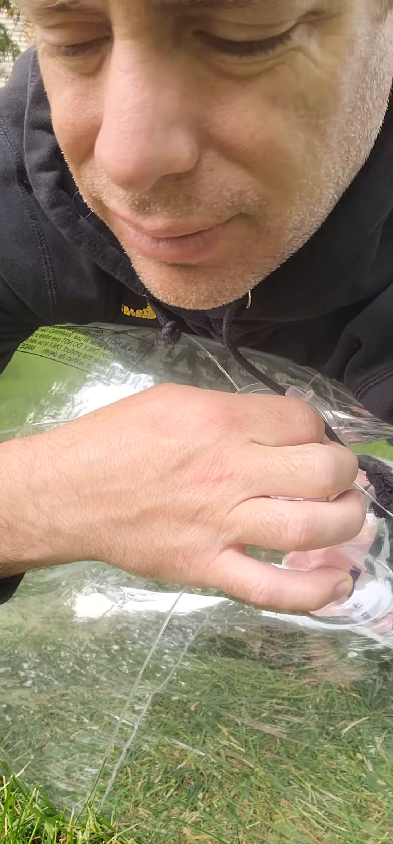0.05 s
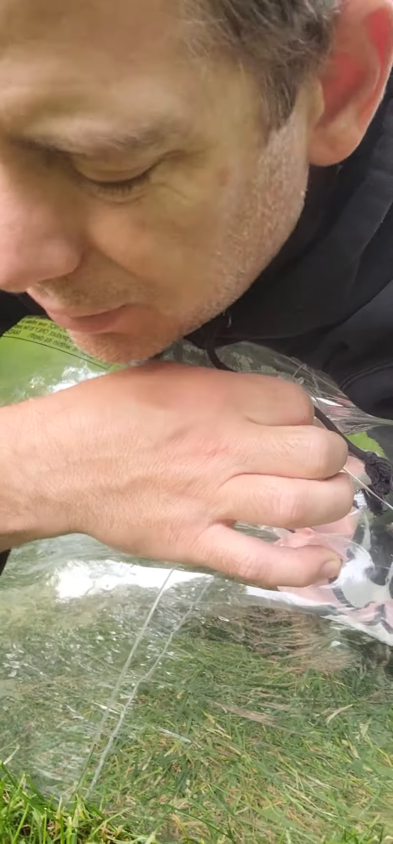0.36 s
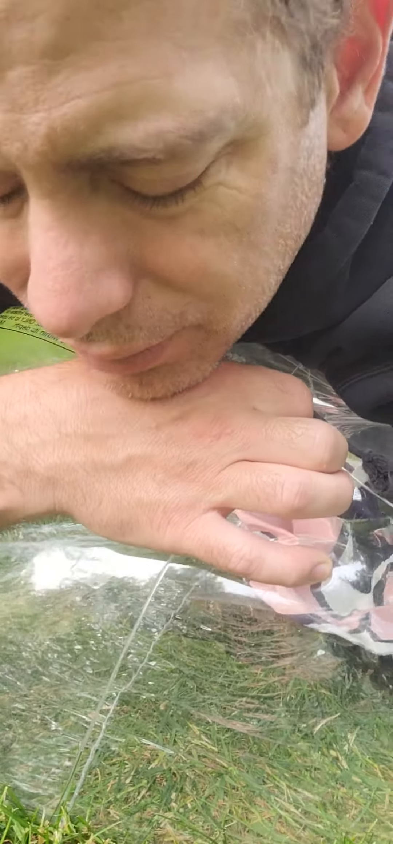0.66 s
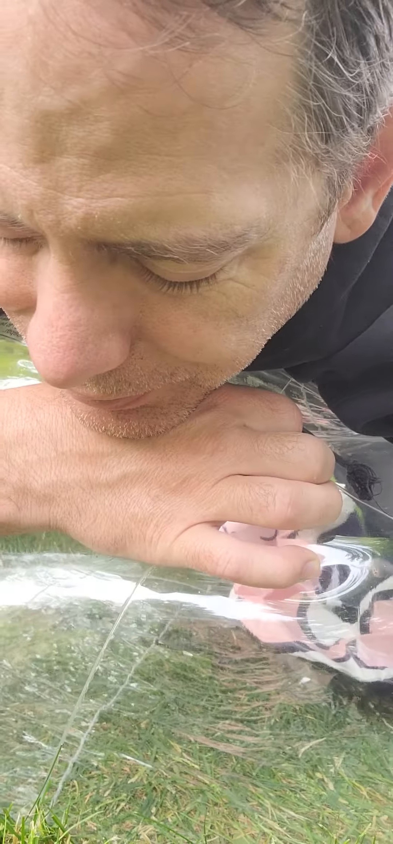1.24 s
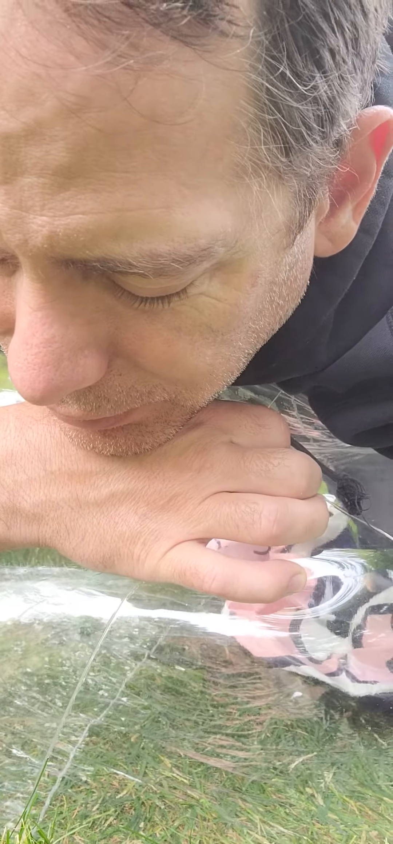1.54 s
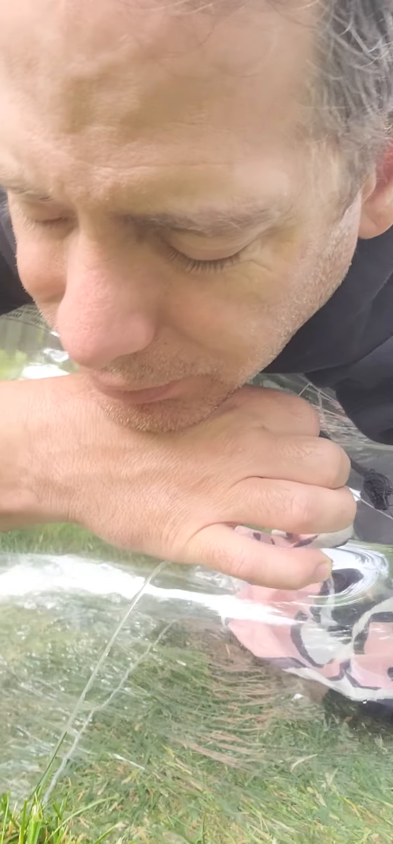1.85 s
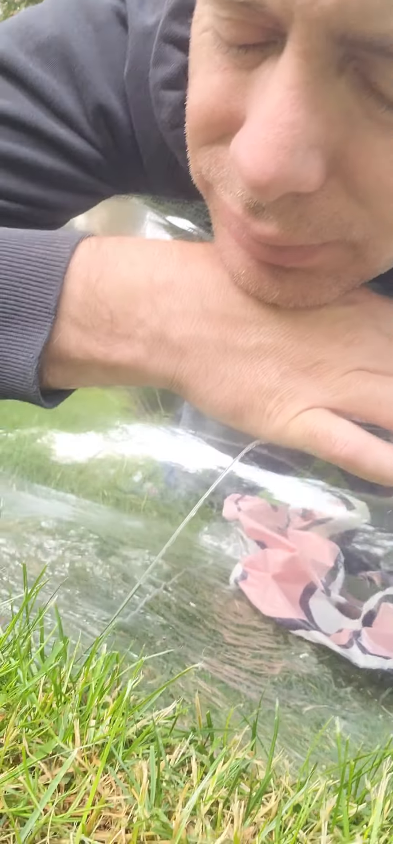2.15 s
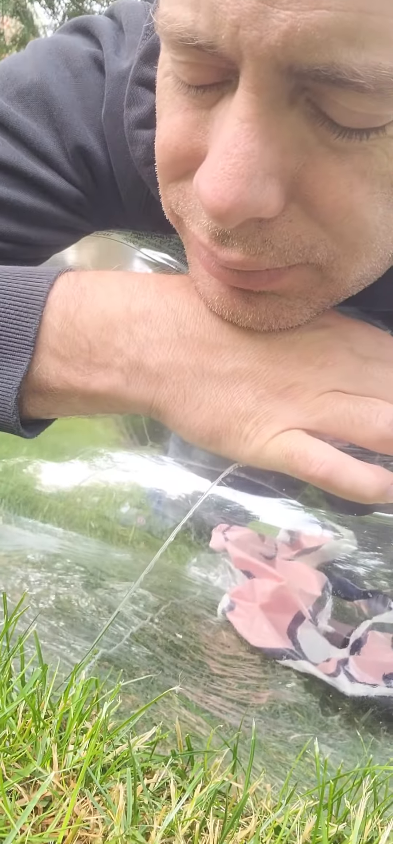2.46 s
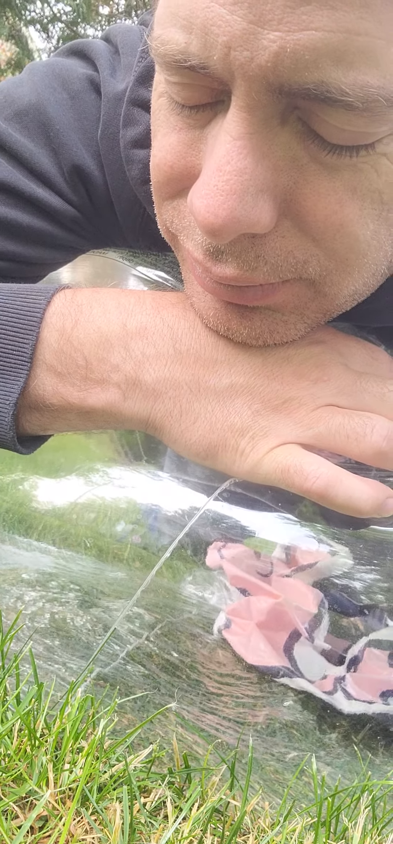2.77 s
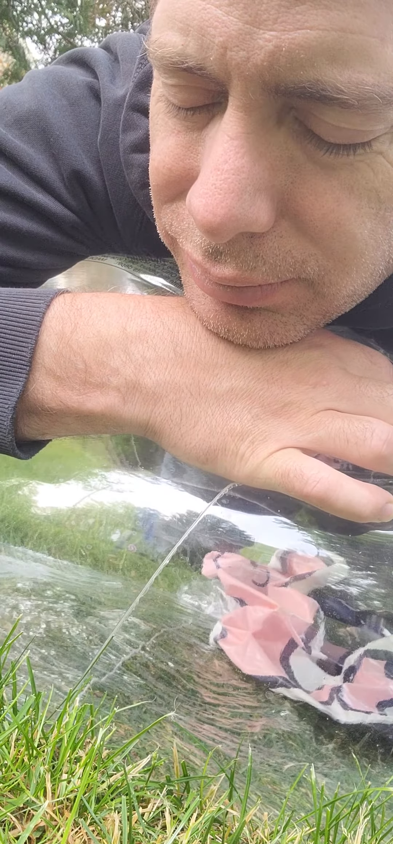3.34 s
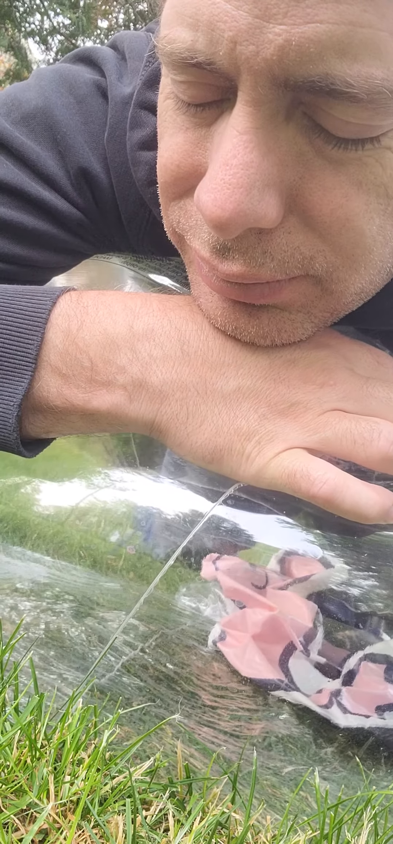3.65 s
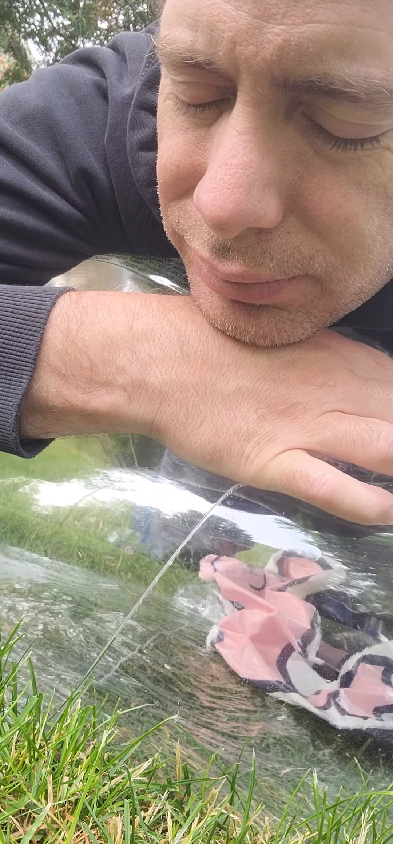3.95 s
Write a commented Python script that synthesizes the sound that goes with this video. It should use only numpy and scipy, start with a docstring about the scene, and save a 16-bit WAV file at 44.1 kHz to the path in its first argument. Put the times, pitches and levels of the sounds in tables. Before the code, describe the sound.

Air hisses steadily out of a plastic inflatable, with a brief knock and scrape halfway.

```python
"""On a lawn, close to a hand-held phone, air hisses out of a plastic inflatable that someone leans on.
The jet carries three thin resonances and slowly dulls. Halfway the phone shifts: knocks ring the
air-filled skin, the plastic sticks and slips in a scrape, then settles in creaks and ticking creases.
A far motor hums in the low outdoor rumble under it all, and near the end a small bird chirps faintly."""
import sys
import numpy as np
from scipy import signal
from scipy.fft import rfft, irfft
from scipy.io import wavfile
from scipy.ndimage import map_coordinates

SR = 44100
rng = np.random.default_rng(int(sys.argv[2]) if len(sys.argv) > 2 else 0)


def persist_wave(psi):
    """Save psi, clipped to +-1, as 16-bit WAV."""
    counts = np.round(np.clip(psi, -1, 1) * 32767).astype(np.int16)
    wavfile.write(sys.argv[1], SR, np.atleast_2d(counts).T)


N = 176400
T = np.arange(N) / SR
HZ = np.maximum(np.arange(N // 2 + 1) * SR / N, 1)


def amp(db):
    """Decibels to gain."""
    return 10 ** (np.asarray(db) / 20)


def curves(table):
    """One automation curve for each column after the time."""
    times, *columns = np.array(table, float).T
    return [np.interp(T, times, col) for col in columns]


def equalise(x, table):
    """EQ two channels by the two dB columns of a table."""
    hz, *columns = np.array(table, float).T
    gain_db = [np.interp(np.log(HZ), np.log(hz), col) for col in columns]
    return irfft(rfft(x) * amp(gain_db), N)


def white():
    """Two unrelated noises at 0 dB per Hz."""
    return rng.standard_normal((2, N)) * np.sqrt(SR / 2)


def unit(x):
    """Scale to rms 1."""
    return x / np.sqrt(np.mean(x ** 2))


def drift(rate_hz):
    """Smooth random modulation up to about this rate, at rms 1."""
    return unit(irfft(rfft(rng.standard_normal(N)) / (1 + (HZ / rate_hz) ** 2), N))


def pan(db):
    """Stereo gains for a level difference; positive is left."""
    return amp(np.array([[db], [-db]]) / 2)


def phase_of(hz):
    """Phase of a moving frequency."""
    return 2 * np.pi * np.cumsum(hz) / SR


def noise_band(hz, spread_hz):
    """Narrow noise around a moving centre."""
    phase = phase_of(hz)
    return unit(drift(spread_hz) * np.cos(phase) + drift(spread_hz) * np.sin(phase))


def delay(x, ms):
    """A moving delay."""
    return map_coordinates(x, [(T - ms / 1000) * SR], order=5, mode="mirror")


def slips(per_s, spread_db):
    """Tiny stereo stick-slip jolts of random size; spread_db boosts some further."""
    jolts = (rng.random((2, N)) < per_s / SR) * rng.standard_normal((2, N))
    return jolts * amp(spread_db * np.minimum(rng.exponential(size=(2, N)), 4))


# Bright opening EQ of the hiss (frequency [Hz], left [dB], right [dB])
HISS_OPEN_EQ = [(500, -110, -110), (1180, -103, -103), (2440, -97, -97.5), (3410, -87, -86),
                (4400, -97.5, -92.5), (5700, -98, -92), (6300, -97.5, -89), (7040, -95.5, -99),
                (8400, -91, -111), (9150, -98, -96), (9740, -96, -89), (10900, -90, -97),
                (11400, -83.5, -91), (12900, -91.5, -94), (15600, -93.5, -102)]
# EQ once the chin presses down (frequency [Hz], left [dB], right [dB])
HISS_PRESSED_EQ = [(499, -110, -110), (1630, -105, -106), (2110, -99.5, -100), (2680, -90, -92),
                   (3540, -94.5, -85.5), (4500, -91, -92.5), (5200, -99, -87.5), (6240, -94, -86.5),
                   (7070, -92, -98), (7950, -94.5, -104), (9500, -108, -101), (9840, -104, -87.5),
                   (10750, -101, -91.5), (11400, -86.5, -95.5), (13000, -98, -93), (15500, -95.5, -104)]
# EQ after the phone shifts (frequency [Hz], left [dB], right [dB])
HISS_SHIFTED_EQ = [(495, -106, -106), (1101.3, -99, -89), (2132.6, -99, -102), (2840, -94.5, -102),
                   (3420, -94.5, -94.5), (5040, -93, -94), (5710, -84.5, -87), (6430, -88.5, -96),
                   (6940, -94, -100), (7900, -96.5, -107), (10010, -104, -101), (10550, -101, -83.5),
                   (11270, -85, -93.5), (12600, -93, -97.5), (13900, -96.5, -102), (14700, -103, -111)]
# Fader ride of the airflow (time [s], gain [dB], treble shelf [dB])
HISS_RIDE = [(0, 0.5, 3), (.4, 1.5, -2), (.6, 1, -1.5), (.95, -1, 0.5), (1.1, 0, -2.5), (1.6, -0.5, -2.5),
             (1.9, -1, 1), (2.3, -1, 2), (2.8, -3.5, 1), (3.5, -2.5, -1), (4, -3, -2.5)]
# Paths to the mics (time [s], left mic lead [ms], delay off the plastic [ms], reflection gain [0-1])
HISS_PATHS = [(0, 0.16, .51, 0.22), (.4, 0.15, 0.46, .1), (.6, .14, 0.452, 0.3), (1, 0.12, 0.32, 0.15),
              (1.2, 0.09, 0.368, .1), (2.02, 0.1, 0.302, 0.02), (2.2, .42, 0.29, 0.2),
              (4, 0.43, 0.32, 0.11)]


def hiss():
    """The air jet reaches two mics directly and off plastic and face; each move changes its colour."""
    flow_db, treble_db = curves(HISS_RIDE)
    lead_ms, echo_ms, reflection = curves(HISS_PATHS)
    shared_power, face_gain, face_path_ratio = .8, .15, 3.12
    jet = white()[0]
    direct = np.sqrt(shared_power) * np.array([jet, delay(jet, lead_ms)])
    direct += np.sqrt(1 - shared_power) * white()
    off_plastic = np.array([reflection * delay(mic, echo_ms) for mic in direct])
    off_face = np.array([face_gain * delay(mic, face_path_ratio * echo_ms) for mic in direct])
    air = direct + off_plastic + off_face
    press_s, press_fade_s, shift_s, shift_fade_s = .99, .12, 2.21, .14
    pressed = np.clip((T - press_s) / press_fade_s + .5, 0, 1)
    shifted = np.clip((T - shift_s) / shift_fade_s + .5, 0, 1)
    air = ((1 - pressed) * equalise(air, HISS_OPEN_EQ)
           + (pressed - shifted) * equalise(air, HISS_PRESSED_EQ)
           + shifted * equalise(air, HISS_SHIFTED_EQ))
    shelf_hz, flicker_db = 7050, 1.5
    body = irfft(rfft(air) / (1 + (HZ / shelf_hz) ** 10), N)
    treble = (air - body) * amp(treble_db)
    return (body + treble) * amp(flow_db + flicker_db * drift(23))


# Low resonance of the leak (time [s], centre [Hz], relative level [dB])
LEAK_LOW = [(0, 4300, -66), (.55, 4450, -65), (.8, 4500, -62.5), (1.02, 4550, -64), (1.15, 4500, -95)]
# Middle resonance (time [s], centre [Hz], relative level [dB], tremolo depth [0-1])
LEAK_MID = [(0, 8000, -57, 0.1), (.33, 8360, -53, 0.2), (.65, 8100, -63.5, 0), (.92, 7970, -64, 0.33),
            (1.15, 8000, -72, 0.65), (1.7, 8100, -70.5, 0.9), (2.05, 8010, -58, 0.13),
            (2.5, 8070, -67, 0.7), (2.8, 8120, -75, 0.34)]
# High resonance (time [s], centre [Hz], relative level [dB])
LEAK_HIGH = [(0, 10080, -48), (.13, 10000, -51), (.23, 10260, -57), (.37, 10200, -47.5),
             (.52, 10250, -54.5), (.65, 10840, -58), (1, 10820, -58.5), (1.4, 10220, -59),
             (1.9, 10300, -78), (2.3, 10300, -83)]


def leak_whistles():
    """The leak resonates in three thin, wavering bands; the middle one pulses."""
    low_hz, low_db = curves(LEAK_LOW)
    mid_hz, mid_db, depth = curves(LEAK_MID)
    high_hz, high_db = curves(LEAK_HIGH)
    tremolo_hz = 13 * (1 + .17 * drift(5.5))
    tremolo = 1 + depth * np.sin(phase_of(tremolo_hz))
    mid = noise_band(mid_hz * (1 + .011 * drift(26)), spread_hz=260) * amp(mid_db) * tremolo
    high = noise_band(high_hz * (1 + .0059 * drift(25.4)), spread_hz=600) * amp(high_db)
    low = noise_band(low_hz * (1 + .027 * drift(38.6)), spread_hz=260) * amp(low_db)
    return (low + mid * unit(pan(15)) + high * unit(pan(-12))) / np.sqrt(2)


# Drone of the far motor (time [s], pitch [Hz], relative level [dB])
MOTOR_DRONE = [(0, 62.7, -43), (.35, 62.3, -48), (.52, 62.65, -51), (.66, 62.2, -38.5), (.8, 61.97, -55),
               (1.2, 64.05, -43), (1.4, 64.3, -58.5), (1.6, 64.06, -43), (2.2, 63.8, -42),
               (2.72, 64.98, -46.5), (2.88, 64.06, -41), (3.1, 63.87, -39.5), (3.5, 64.07, -47.5),
               (4, 63.4, -45)]


def motor():
    """A far motor hums with a soft octave on top, wavering in pitch and level."""
    hz, db = curves(MOTOR_DRONE)
    waver_hz, waver_db, octave_db, trim_db = .15, 1, -15, -1.5
    phase = phase_of(hz + waver_hz * drift(14))
    hum = np.sqrt(2) * (np.sin(phase) + amp(octave_db) * np.sin(2 * phase))
    return hum * amp(db + trim_db + waver_db * drift(18))


# Outdoor noise bed (frequency [Hz], mid [dB per Hz], side [dB per Hz])
RUMBLE_EQ = [(15, -78, -64), (42, -68.5, -77), (75.6, -62.5, -73.5), (101, -75.5, -102), (163, -81, -86),
             (194.4, -79.5, -101), (257, -88, -94.5), (660, -100, -101), (1050, -106, -107),
             (3680, -120, -120)]


def rumble():
    """A steady bed of low outdoor noise, spread in mid-side stereo."""
    mid, side = equalise(white(), RUMBLE_EQ)
    return np.array([mid + side, mid - side])


# Modes of the air-filled skin (frequency [Hz], bandwidth [Hz], gain [dB])
SKIN_MODES = [(205, 30, -5), (373, 20, 4.5), (417, 22, 2), (455, 20, 3.5), (541, 36, 1.5), (630, 22, 0),
              (683, 22, 0), (744, 30, 1.5), (812, 24, 1), (1180, 60, -16)]


def skin_ring(x):
    """The inflatable's skin answers a push with a hollow ring."""
    response = sum(amp(db) / (1 + 1j * (HZ - hz * hz / HZ) / width) for hz, width, db in SKIN_MODES)
    return irfft(rfft(x) * response, N)


# Dull hits on the skin (time [s], level [dB], pitch [Hz], pan [dB])
KNOCK_HITS = [(.314, -49, 605, -5), (0.391, -48.5, 650, -3), (.404, -46.5, 660, -5), (0.451, -37, 298, 2.5),
              (.492, -44.5, 510, -6), (0.991, -47, 406.3, -6), (1.886, -44, 453, 23),
              (1.983, -38, 734, -10), (2.007, -23.5, 646, 3), (2.0184, -23, 560, -18.5),
              (2.037, -36.5, 640, 22), (2.152, -31.5, 400, -8), (2.175, -27, 80.9, 2), (2.189, -39, 71, 12),
              (2.205, -31, 70.2, 6), (3.023, -46, 603, 11), (3.312, -43.5, 720, 2), (3.338, -46, 738, 8),
              (3.413, -46, 520.5, 0), (3.461, -46, 593, -8), (3.483, -35.5, 69.5, 4)]


def knocks():
    """Short soft pushes, each followed by the ring of the skin."""
    fade_cycles, ring_db = .33, -3.5
    pushes = np.zeros((2, N))
    for peak_s, db, hz, pan_db in KNOCK_HITS:
        cycles = (T - peak_s) * hz
        envelope = np.exp(-np.minimum(np.abs(cycles) / fade_cycles, 50))
        pushes -= amp(db) * pan(pan_db) * np.cos(2 * np.pi * cycles) * envelope
    return pushes + amp(ring_db) * skin_ring(pushes)


# Tone of a snapping crease, shared with the crackle (frequency [Hz], left [dB], right [dB])
CREASE_EQ = [(150, -14, -14), (800, 0, 1), (3000, -5, -4), (6000, -1, 0), (9200, -7, -7), (12000, -2, -1),
             (15800, -9, -8)]
# Single crease snaps (time [s], pre-EQ level [dB], pan [dB])
TICK_HITS = [(.491, -53, 4), (1.981, -39, -4), (2.018, -25.5, -14), (2.042, -31, -9), (2.208, -40, -3),
             (2.236, -37, -3), (2.245, -35.5, -7), (2.32, -39, -3), (2.332, -33, -4), (2.354, -37, -6),
             (2.416, -38, -2), (2.488, -33, -3.5), (2.531, -40, -5), (2.545, -37, -2), (2.604, -35, 6),
             (2.697, -38, 2), (3.45, -47, -2), (3.47, -46, 8), (3.641, -48, -7)]


def ticks():
    """Creases in the plastic snap, each with a tiny burst of bright noise."""
    decay_s = .0011
    envelope = np.zeros((2, N))
    for start_s, db, pan_db in TICK_HITS:
        decay = np.exp(-np.clip((T - start_s) / decay_s, 0, 50))
        envelope += amp(db) * pan(pan_db) * (T >= start_s) * decay
    return equalise(envelope * rng.standard_normal((2, N)), CREASE_EQ)


def chamber_echo(x):
    """Echoes inside the inflatable, duller on each pass, make a sound hollow."""
    round_trip_s, damping_hz = .0112, 3000
    feedback = .5 / (1 + (HZ / damping_hz) ** 2)
    return irfft(rfft(x) / (1 - feedback * np.exp(-2j * np.pi * HZ * round_trip_s)), N)


# Fader rides of the rubbing plastic (time [s], creak level [dB], scrape level [dB])
RUB_RIDE = [(0, -92, -93), (1.75, -66, -90), (1.89, -58, -52), (1.94, -65, -53), (2.0, -42, -43),
            (2.035, -40.5, -50), (2.055, -44, -40.5), (2.09, -37.5, -36), (2.135, -39.5, -39.5),
            (2.153, -31, -31.5), (2.19, -48, -46), (2.28, -59, -48.5), (2.34, -52.5, -50), (2.46, -62, -57),
            (2.8, -65.5, -73), (3.05, -61.5, -81), (3.22, -64, -98), (3.46, -61, -50.5), (3.58, -61, -64),
            (4, -71.5, -83)]
# Tone of scraped plastic (frequency [Hz], left [dB], right [dB])
SCRAPE_EQ = [(151, 15, 22.5), (300, -5, 18), (500, 30, -0.5), (1150, -17, -2.5), (2250, -6, 5),
             (4270, -12, -2.5), (7500, -17, 3.5), (9800, -35, -8), (11800, -20, 8), (15800, -21, -7)]


def rubbing():
    """Plastic sticks and slips: sparse jolts creak through the skin, dense ones blur into a scrape."""
    creak_db, scrape_db = curves(RUB_RIDE)
    creak = unit(skin_ring(slips(per_s=500, spread_db=0)))
    grains = equalise(slips(per_s=9000, spread_db=1.5), SCRAPE_EQ)
    scrape = unit(chamber_echo(grains))
    return creak * amp(creak_db) * pan(-2.5) + scrape * amp(scrape_db)


# Fader ride of the fine crackle (time [s], level [dB])
CRACKLE_RIDE = [(1.9, -85), (2.05, -64), (2.25, -67), (2.55, -64), (2.75, -71), (4, -77)]


def crackle():
    """Many tiny creases let go as the plastic settles."""
    snaps = equalise(slips(per_s=420, spread_db=1), CREASE_EQ)
    return unit(snaps) * amp(curves(CRACKLE_RIDE)[0])


# Bird calls (time [s], length [s], start pitch [Hz], end pitch [Hz], pre-pan level [dB])
BIRD_CHIRPS = [(3.05, 0.032, 7960, 7130, -65), (3.263, 0.041, 7800, 7090, -63.5),
               (3.275, 0.067, 9420, 8050, -69), (3.851, 0.048, 7070, 7185, -65.5)]


def bird():
    """A small bird on the left gives thin, slightly rough chirps, most of them falling."""
    chirps = np.zeros(N)
    for start_s, length_s, start_hz, end_hz, db in BIRD_CHIRPS:
        progress = np.clip((T - start_s) / length_s, 0, 1)
        glide_hz = start_hz + (end_hz - start_hz) * progress
        chirps += amp(db) * np.sin(np.pi * progress) * noise_band(glide_hz, spread_hz=360)
    return chirps * pan(19)


def scene():
    """The stereo mix: escaping air, handled plastic and the outdoor background."""
    air = hiss() + leak_whistles()
    plastic = knocks() + rubbing() + crackle() + ticks()
    return air + plastic + bird() + motor() + rumble()


def record(dry):
    """The phone cuts the top end with a steep low-pass."""
    cutoff_hz = 15850
    return signal.sosfilt(signal.ellip(10, .2, 70, cutoff_hz, fs=SR, output="sos"), dry)


dry = scene()
out = record(dry)
persist_wave(out)
```